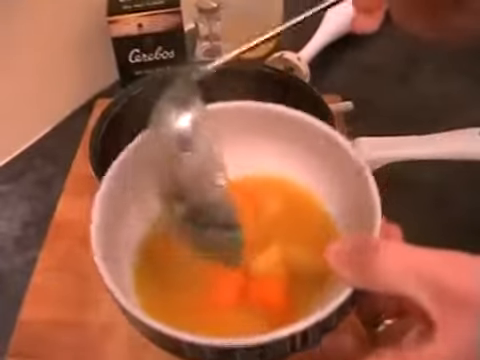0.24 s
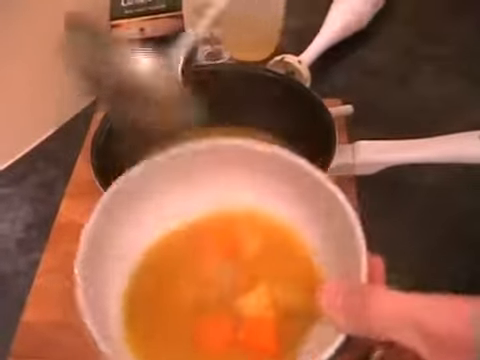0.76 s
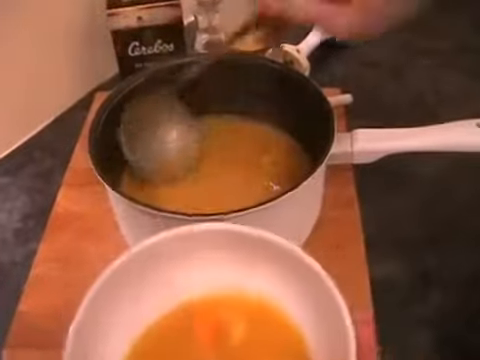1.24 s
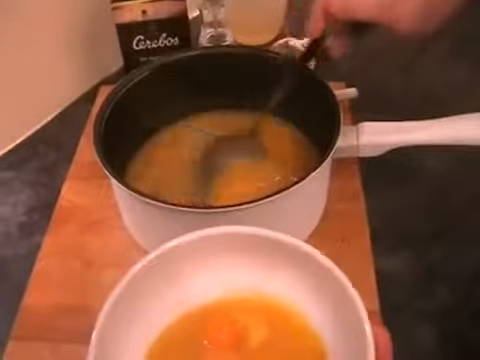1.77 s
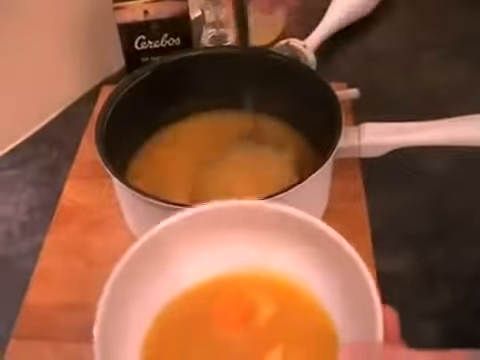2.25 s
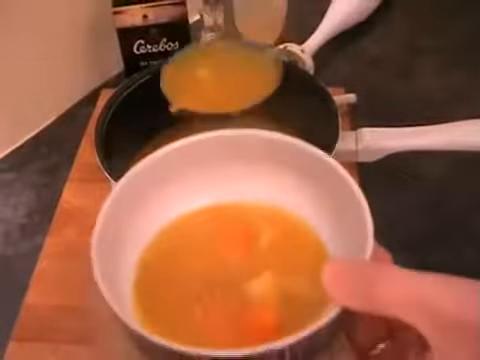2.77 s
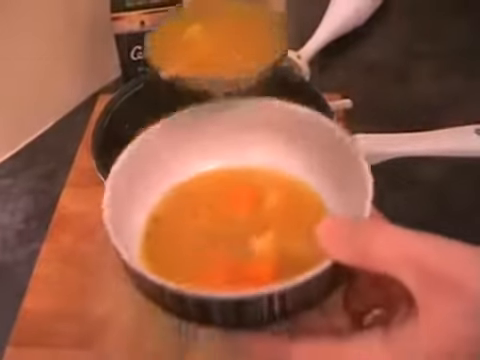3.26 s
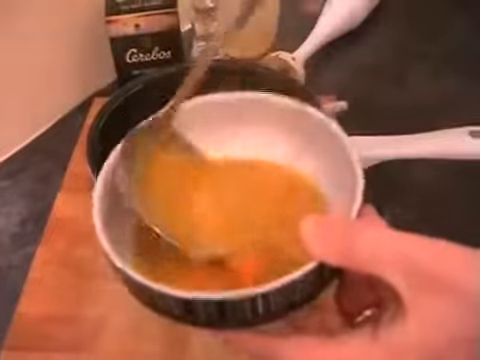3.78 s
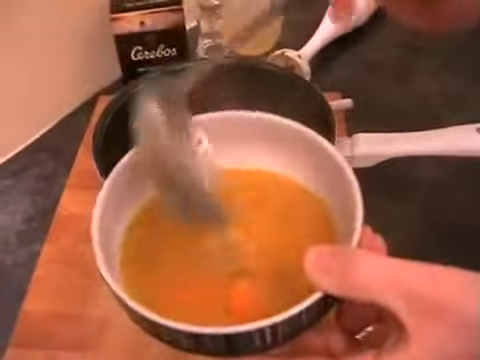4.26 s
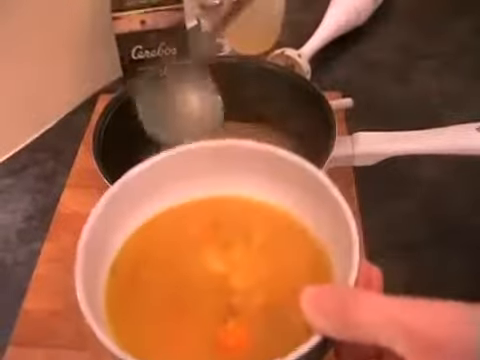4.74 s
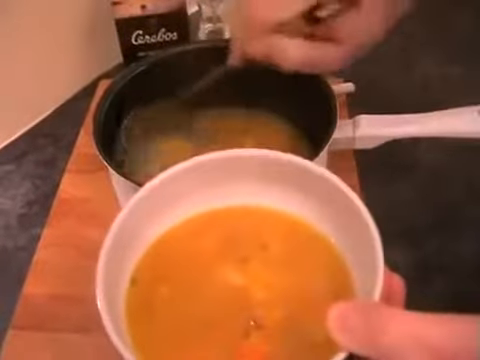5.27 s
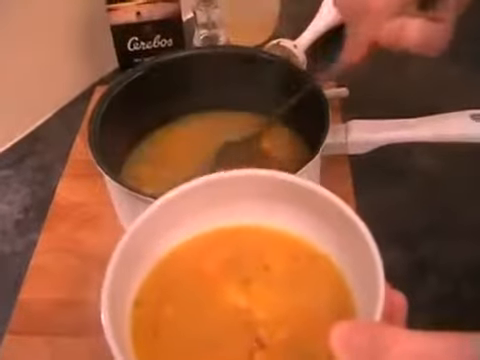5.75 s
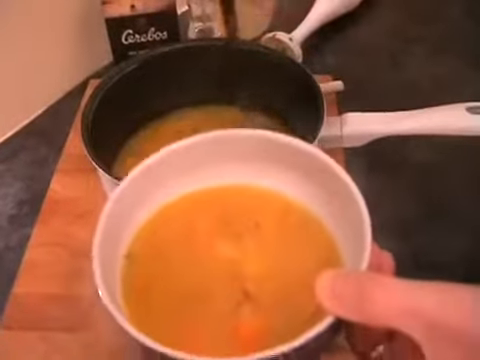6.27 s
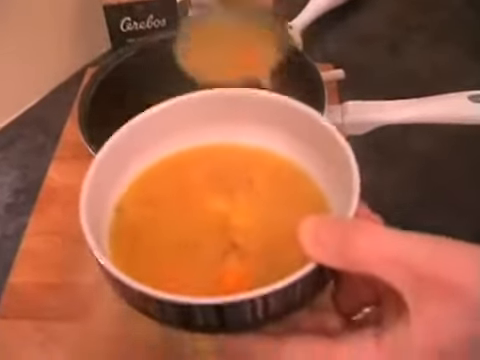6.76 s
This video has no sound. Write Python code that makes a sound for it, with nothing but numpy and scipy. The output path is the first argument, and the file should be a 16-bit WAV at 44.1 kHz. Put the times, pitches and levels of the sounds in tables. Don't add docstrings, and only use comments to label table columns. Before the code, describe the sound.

A steel ladle clanks hard into a soup pan, scrapes and stirs, then knocks several more times in a small hard kitchen with faint hum.

```python
import sys
import numpy as np
from scipy import signal
from scipy.fft import rfft, irfft
from scipy.io import wavfile
from scipy.ndimage import uniform_filter1d, minimum_filter1d

SR = 44100
rng = np.random.default_rng(int(sys.argv[2]) if len(sys.argv) > 2 else 0)


def wav_record(signal):
    frames = np.transpose(np.atleast_2d(signal))
    bounded = np.clip(frames, -1, 1)
    quanta = np.round(bounded * 32767).astype(np.int16)
    wavfile.write(sys.argv[1], SR, quanta)


def to_linear_factor(level_db):
    exponent = np.asarray(level_db, float) / 20
    return 10 ** exponent


N = 309582

# f/Hz, density/dB per Hz
AIR_SPECTRUM = [(15, -83.5), (25, -36), (69, -7.5), (89, -4), (202, -4.5), (229, -11.5), (279, -4.5),
                (358, -7), (459, -8.5), (494, -1.5), (589, -16.5), (650, -11), (1100, -20), (8220, -28),
                (9540, -39.5), (12400, -57.5), (21000, -120)]
AIR_DB, AIR_SWAY_DB = -44.5, 0.5
# f/Hz, width/Hz, level/dB
KITCHEN_PEAKS = [(364.5, 47, 3), (693, 103, -2.5), (989, 41, -8), (1335, 42, -12), (1911, 64, -12.5),
                 (2565, 34, -17)]
# f/Hz, level/dB rms
HUM = [(100, -51.5), (290, -56)]
# f/Hz, t60/s
ROOM_T60 = [(100, 1), (400, 0.4), (1500, 0.62), (4000, 0.54), (9000, 0.58)]

# t/s, length/s, start f/Hz, end f/Hz, level/dB rms
TRICKLES = [
    (0, 0.29, 8700, 9220, -66),
    (0.245, 0.36, 9100, 7940, -66.5),
    (2.913, .3, 7440, 8550, -71),
    (3.22, 0.18, 8550, 8850, -69),
]
# t/s, peak level/dB
CAMERA_TICKS = [(0.1024, -48), (0.1414, -50), (0.2214, -47), (0.3014, -44), (0.4614, -44), (0.5824, -52),
                (0.7003, -42), (0.7796, -47), (0.8205, -46), (0.9398, -48), (1.0999, -46), (2.2204, -49),
                (2.2604, -52), (2.4209, -51), (2.6599, -53), (2.7013, -46), (2.7402, -51), (2.82, -47),
                (2.9014, -46), (3.0215, -49), (3.1004, -50), (3.2999, -45), (3.3814, -52), (3.5009, -45),
                (3.5414, -47), (3.8214, -56), (3.8995, -46), (3.9804, -50), (4.2203, -46), (4.2617, -50),
                (4.4214, -53), (4.5414, -52), (4.6209, -49), (4.7014, -51), (4.7414, -51), (4.8199, -51),
                (6.4198, -50), (6.4592, -49), (6.5014, -51), (6.54, -49), (6.8593, -47)]

# t/s, peak level/dB, centre f/Hz, t60/s, width/share of centre
TICKS = [(0.99, -27.5, 8100, 0.019, 0.93), (1.196, -39, 8300, 0.021, 0.54), (1.622, -36, 7640, .015, 0.3),
         (1.7948, -37, 7000, 0.022, 0.27), (1.8346, -33.5, 4130, 0.18, 0.25),
         (1.884, -32.5, 7000, .015, .8), (1.9571, -21, 4000, 0.029, 1.5), (2.5057, -28, 7000, 0.079, 1.05),
         (3.1889, -17.5, 6350, 0.032, 0.43), (3.6263, -29.5, 6500, 0.035, 1.5),
         (3.648, -28, 6000, 0.092, 2.4), (3.664, -34, 5000, .015, 1.1), (3.691, -26.5, 1150, 0.053, 1.9),
         (3.6918, -27.5, 3900, .02, 0.45), (3.7157, -13, 5600, 0.0036, 1.4), (3.719, -32, 5900, .015, 0.75),
         (4.156, -24, 3930, 0.046, 0.41), (4.502, -41, 7500, .01, .64), (4.79, -32, 8800, 0.0081, 0.25),
         (4.9155, -21, 4500, .04, 1.2), (4.928, -13, 2500, 0.011, 1), (5.757, -32, 3000, 0.02, 3),
         (5.7786, -37, 3020, 0.014, 1.9), (5.918, -15.5, 5530, 0.012, 0.25),
         (6.5793, -28.5, 8000, 0.064, 0.46), (2.5065, -41, 3500, .02, 1.5), (3.189, -29, 2900, 0.028, 2),
         (3.192, -31, 6500, 0.22, 0.82), (3.6268, -42, 1950, 0.013, 0.33), (6.1086, -40, 2480, .03, 0.53),
         (6.119, -39, 7000, .05, 0.76), (6.1767, -32, 6000, .05, 1.3), (6.5793, -39, 3500, .02, 1.5),
         (1.2672, -12, 3000, .015, 1.7)]
# t/s, peak level/dB, centre f/Hz, t60/s,
# width/share of centre
REBOUNDS = [(1.2655, -8, 2200, .01, 1.2), (1.2690, -5, 2500, .012, 1.2), (1.3295, -19, 700, .02, 1.9),
            (1.35, -16, 900, 0.018, 1.5), (1.9415, -27, 3360, 0.022, .3), (1.9425, -15, 1390, 0.033, 0.79),
            (1.9575, -22.5, 1900, 0.045, .3), (1.958, -22, 3400, .03, .5), (4.9185, -16, 3300, .03, 0.22),
            (4.9245, -9, 700, .015, 1.2), (4.9265, -19, 4800, .025, .6), (4.9315, -20, 2500, .02, 0.45),
            (5.905, -23, 5000, .03, 0.75), (5.9185, -33.5, 6500, 0.023, .9),
            (5.9225, -9.5, 837, 0.05, 0.37), (5.9205, -21, 1850, .04, .2), (6.1188, -34, 5700, .06, .3),
            (6.1772, -37, 4800, .08, .4), (6.205, -38, 5000, .05, .5), (6.25, -38, 4600, .06, .3),
            (7.0088, -10.5, 700, 0.01, 0.84), (7.0125, -33, 6330, .03, .3)]
TICK_SEND_DB = -18

KNOCK_S = [1.2615, 1.941, 4.918, 5.3362, 5.9046, 7.0093]
# rattle peak level/dB, rattle t60/s, clack level/dB, ring level/dB, room send level/dB
KNOCKS = [
    (5, 0.032, -7, -21, -10),
    (-6.5, 0.13, -7, -10, -9.5),
    (-3, 0.07, -7, -16.5, -10.5),
    (-14.5, 0.14, -6, -16.5, -9),
    (-1.5, 0.1, -6.5, -13.5, -15),
    (-8.5, 0.081, -8, -31, 7),
]
# f/Hz, density/dB per Hz
RATTLES = [
    [(423, 7), (840, -2), (1060, -14), (1300, 5), (1560, -8.5), (1870, -3), (4200, -2), (9500, -16.5)],
    [(233, -3), (556, 0), (802, -6.5), (1390, -10), (2460, -22), (2760, -19.5), (3500, -22), (4460, -24.5),
     (9500, -42.5)],
    [(117, -6.5), (432, 0), (1400, -12.5), (3300, -14), (5870, -19), (8870, -31), (9500, -59)],
    [(404, -6.5), (1240, -20), (3310, -24), (4170, -26), (4570, -23), (5870, -27.5), (6440, -36),
     (9500, -41)],
    [(112, -12), (300, -3), (450, 2), (963, -22), (1870, -13.5), (3000, -20.5), (6440, -25), (9500, -45)],
    [(650, -4.5), (1450, -22), (1830, -31), (2120, -17.5), (2640, -26), (5000, -40), (6440, -42),
     (9500, -49)],
]
# f/Hz, density/dB per Hz
RATTLE_BASS = [(24, -45), (40, -17)]
RATTLE_TOP = [(12400, -69), (20900, -120)]
RATTLE_HOLD_S = 0.0033
# f/Hz, level/dB, t60/s
CLACKS = [
    [(427, -17, 0.063), (820, -2, 0.037), (1280, -20, 0.064), (1950, -1, 0.02), (2560, -6.5, 0.051),
     (4210, -10, 0.052)],
    [(525.7, 2.5, 0.12), (945, -12, 0.07), (1353, -7.5, 0.13), (2740, -6, 0.04), (3420, -8.5, 0.044),
     (4620, -16, 0.064)],
    [(423, 5.5, 0.071), (760, 1.5, 0.03), (1920, 1, 0.045), (2514, -5, 0.05), (3300, -14, 0.071),
     (5940, -20, 0.036)],
    [(413, 5.5, 0.1), (790, -4, 0.17), (1490, -7, .06), (3130, -17, 0.082), (3730, -9, 0.06),
     (4500, -3.5, 0.041)],
    [(397, 3.5, 0.077), (517, 9, 0.095), (903, -3, 0.12), (1363, -20, 0.08), (1877, 5.5, 0.05),
     (3670, -13, 0.035)],
    [(650, 1, 0.089), (1210, -29, 0.047), (1400, -4, 0.072), (2150, -26, .05)],
]

# f/Hz, level/dB, t60/s
ON_RIM = [(107.3, -5.5, 0.68), (218, -9, 0.68), (328, -11, 0.65), (836, -8.5, 0.2), (1218, -5, 0.54),
          (1313, -9.5, 0.47), (1780, -14, 0.59), (1870, -13, 0.27), (2310, -24, 0.41), (3070, -8.5, 0.52),
          (3636, -3, 0.3), (4580, -22, .4), (4630, -22, 0.23), (7360, -18, 0.18)]
ON_FAR_WALL = [(113.8, 1, 0.35), (190.5, -6.5, 0.57), (269, -13, 0.58), (404, -6, 0.24), (538, 14.5, 0.095),
               (568, -8, 0.52), (683, -10, 0.74), (976, -3, 0.2), (1030, -18, 0.39), (1360, -21, 0.34),
               (1850, -20.5, 0.36), (1916, -20, 0.24), (2780, -33, .08), (3350, -19, .07)]
ON_NEAR_WALL = [(105.7, 1.5, 0.33), (268, -5, 0.57), (329, -5, 0.37), (401, -6, 0.27), (519, 10, 0.098),
                (734, -7, 0.25), (948, -2.5, 0.24), (1660, -17, 0.42), (2390, -19, .4), (3110, -5.5, 0.19),
                (3320, -5, 0.15), (4500, -13, .09), (5600, -11, 0.11), (5930, -8, 0.056)]
ON_FLOOR = [(115.4, 6.5, 0.38), (222.4, 2.5, 0.42), (700, -15, .28), (980, -2, 0.31), (1590, -4, 0.25),
            (1950, -10.5, 0.6), (2360, -6.5, 0.18), (2750, -11, 0.45), (3080, -9.5, 0.15),
            (3695, -28, 0.33), (4450, -20, .25), (5222, -31, .43)]
ON_CORNER = [(111.5, 7, 0.3), (211, -4, 0.41), (265, -15, 0.97), (402, -2.5, 0.56), (504, -1, 0.44),
             (872, -3.5, 0.18), (988, -10, 0.32), (1390, -16, 0.41), (1783, -1, 0.17), (1820, 0, 0.12),
             (2240, -20, 0.18), (2766, -3, 0.085), (3680, -34, .3), (4700, -32, 0.36)]
ON_BOWL = [(523, 8, .14), (1037, 1, .2), (1894, -12, .22)]
RING_WOBBLE = 0.35

# t/s, f/Hz, level/dB, t60/s
NUDGES = [(1.328, 330, -16, .05), (1.347, 330, -19, .05), (1.376, 450, -16, .14), (1.398, 300, -21, .12),
          (4.9225, 430, -13, .06), (5.918, 520, -10, .05), (5.37, 330, -27, .15), (6.292, 690, -36, .5),
          (6.29, 1850, -46, .8), (6.272, 3070, -52, .5), (6.225, 3660, -46, .4), (6.228, 2480, -40, .15),
          (5.342, 3690, -35, .2), (5.342, 3060, -38, .3), (4.156, 4130, -37, .07), (1.263, 3130, -26, .4),
          (1.263, 3655, -25, .2), (4.93, 3060, -32, .2), (4.93, 4550, -37, .2), (5.16, 180, -36, .2)]

# f/Hz, width/Hz, level/dB
PAN_WALL = [(411, 29, 4), (475, 46, -1.5), (524, 16, 1.5), (704, 10, -3.5), (747, 27, -2.5),
            (817, 70, -1.5), (970, 53, -3), (1310, 4.3, -25)]
PAN_FLOOR = [(169.5, 9.2, -2), (214.5, 22, 4.5), (258.7, 24, 4), (331, 5.1, -3)]
STEEL = [(1235, 30, 3), (1820, 110, 3), (2460, 30, -0.5), (3110, 45, -2.5), (3600, 37, -7), (4580, 150, 2),
         (4930, 54, 0.5), (5750, 120, -1.5), (6510, 60, -12), (6930, 60, -14.5), (7800, 160, -13.5)]
BOARD_HZ, BOARD_WIDTH_HZ = 110.4, 15.3

# peak t/s, rise/s, fall/s, peak level/dB
SETTLES = [
    (1.33, 0.025, 0.089, -20),
    (5.08, 0.022, 0.2, -42),
    (6.0, 0.058, 0.025, -24.5),
]
SHOVES = [
    (1.422, 0.11, 0.082, -32),
    (1.676, 0.09, 0.2, -35),
    (1.79, 0.084, 0.17, -31.5),
    (5.186, 0.13, 0.064, -37),
    (5.574, .2, .3, -56),
    (5.702, 0.31, 0.33, -36.5),
    (6.315, 0.043, 0.039, -43),
]
SWEEPS = [
    (1.78, 0.18, 0.18, -36),
    (4.425, 0.029, 0.13, -51),
    (5.27, 0.11, 0.13, -44),
    (5.86, 0.14, 0.31, -44),
]
LIFTS = [
    (6.104, 0.064, 0.21, -27),
    (6.245, 0.73, 0.036, -34),
]
GRAZES = [
    (5.26, 0.1, 0.25, -49.5),
    (5.57, 0.19, 0.17, -60.5),
    (6.33, 0.045, 0.085, -67),
    (6.125, 0.052, 0.19, -52.5),
    (6.185, 0.1, 0.18, -44),
    (6.268, 0.32, 0.024, -42.5),
]
# board level/dB, pan floor level/dB, pan wall level/dB, bare steel level/dB
SETTLE_DB = (-21, -1, -11, -27)
SHOVE_DB = (1.5, -14, -12, -19)
SWEEP_DB = (-8, -24, 3.5, -28)
LIFT_DB = (-31, -1.5, -8, -20)
GRAZE_DB = (-34, -25, -2, 1)

# f/Hz, width/Hz, depth/0-1
TREBLE_DIPS = [(3300, 82, 0.4), (4100, 560, 0.21), (4920, 100, 1), (5360, 69, 0.6), (6600, 57, 1),
               (7150, 82, 0.8)]


def unit(x):
    return x / np.sqrt(np.mean(x ** 2) + 1e-30)


def on_log(hz, table):
    f, v = np.transpose(table)
    return np.interp(np.log(np.maximum(hz, 1)), np.log(f), v)


def colour(x, spectrum):
    size = 2048
    gain_db = on_log(np.arange(size // 2 + 1) * SR / size, spectrum)
    cepstrum = irfft(np.log(to_linear_factor(gain_db)))
    cepstrum[1:size // 2] *= 2
    cepstrum[size // 2 + 1:] = 0
    impulse = irfft(np.exp(rfft(cepstrum)))
    return signal.fftconvolve(x, impulse)[:len(x)]


def resonate(x, hz, width_hz):
    hz = min(hz, 0.45 * SR)
    return signal.lfilter(*signal.iirpeak(hz, hz / width_hz, fs=SR), x)


def body(x, peaks, spread):
    total = np.sqrt(np.pi / SR * sum(to_linear_factor(2 * db) for _, _, db in peaks))
    out = 0
    for k, (hz, width_hz, db) in enumerate(peaks):
        width_hz = width_hz * spread
        out = out + (-1) ** k * to_linear_factor(db) * resonate(x, hz, width_hz) / np.sqrt(width_hz)
    return out / total


def walk(rate_hz, count=N):
    hold = int(SR / rate_hz)
    steps = np.repeat(rng.standard_normal(count // hold + 1), hold)
    return unit(uniform_filter1d(steps, hold)[:count])


def fade(t, t60):
    return to_linear_factor(-60 * np.maximum(t, 0) / t60)


def add(track, s, x):
    i = int(s * SR)
    track[i:i + len(x)] += x[:N - i]


def ring(t, modes, rise_cycles, wobble, rate_hz):
    out = 0
    for hz, db, t60 in modes:
        swell = 1 - np.exp(-(t * hz / rise_cycles) ** 2)
        waver = np.exp(wobble * walk(rate_hz, count=len(t)))
        out = out + to_linear_factor(db) * swell * waver * fade(t, min(t60, 1.2)) * np.sin(2 * np.pi * hz * t)
    return out


def kitchen():
    t = np.arange(N) / SR
    broad = unit(colour(rng.standard_normal(N), AIR_SPECTRUM))
    boom = body(rng.standard_normal(N), KITCHEN_PEAKS, spread=0.5) * to_linear_factor(1.5 * walk(12))
    waver_db = 1.2 * walk(8)
    hum = sum(to_linear_factor(db + waver_db) * np.sqrt(2) * np.sin(2 * np.pi * hz * t) for hz, db in HUM)
    return to_linear_factor(AIR_DB) * (to_linear_factor(-1.5 + AIR_SWAY_DB * walk(4.6)) * broad + to_linear_factor(-4.5) * boom) + hum


def trickles():
    out, t = np.zeros(N), np.arange(N) / SR
    for s, length_s, from_hz, to_hz, db in TRICKLES:
        along = np.clip((t - s) / length_s, 0, 1)
        pitch_hz = (from_hz + (to_hz - from_hz) * along) * (1 + 0.012 * walk(150))
        gain = to_linear_factor(db + 1.5 * walk(43.5)) * np.sqrt(np.abs(np.sin(np.pi * along)))
        out += np.sqrt(2) * gain * np.sin(2 * np.pi * np.cumsum(pitch_hz) / SR)
    return out


def camera():
    out, t = np.zeros(N), np.arange(SR // 20) / SR
    for s, db in CAMERA_TICKS:
        click = resonate(rng.standard_normal(len(t)) * fade(t, 0.023), 6500, 3000)
        add(out, s, to_linear_factor(db + 1.0) * click / np.abs(click).max())
    return out


def ticks(table):
    near, send = np.zeros((2, N))
    t = np.arange(SR // 4) / SR
    snap = 1 + 0.83 * fade(t, 0.0035)
    for s, db, hz, t60, share in table:
        burst = rng.standard_normal(len(t)) * fade(t, t60) * snap
        burst[0] = 7
        tick = resonate(burst, hz, hz * share)
        tick = resonate(tick, hz, hz * share * 0.52)
        tick *= to_linear_factor(db) / np.abs(tick).max()
        add(near, s + 0.00039, tick)
        add(send, s, tick * to_linear_factor(TICK_SEND_DB))
    return near, send


def knocks():
    near, send = np.zeros((2, N))
    t = np.arange(SR) / SR
    low_pass = signal.butter(2, 1000, fs=SR, output="sos")
    rings = ON_RIM, ON_FAR_WALL, ON_NEAR_WALL, ON_FLOOR, ON_CORNER, ON_BOWL
    for s, row, spectrum, clacks, modes in zip(KNOCK_S, KNOCKS, RATTLES, CLACKS, rings):
        db, t60, clack_db, ring_db, send_db = row
        spectrum = RATTLE_BASS + spectrum + RATTLE_TOP
        contacts = rng.standard_normal(SR) * to_linear_factor(2.5 * walk(600, count=SR))
        rattle = colour(contacts * fade(t - RATTLE_HOLD_S, t60), spectrum)
        low = signal.sosfilt(low_pass, rattle)
        high = rattle - low
        rattle = low * (1 - np.exp(-(t / 0.0037) ** 2)) + high * (1 + 0.5 * fade(t, 0.014))
        rattle *= to_linear_factor(db) / np.abs(rattle).max()
        clack = ring(t, clacks, rise_cycles=3.2, wobble=0.2, rate_hz=160)
        blow = rattle + to_linear_factor(db + clack_db) * clack
        ringing = ring(t, modes, rise_cycles=3.2, wobble=RING_WOBBLE, rate_hz=48.3)
        add(near, s, blow + to_linear_factor(db + ring_db) * ringing)
        even = colour(fade(t, 0.00031), spectrum)
        even *= np.linalg.norm(blow) / np.linalg.norm(even)
        add(send, s, (0.28 * blow + even) * to_linear_factor(send_db))
    return near, send


def nudges():
    out, t = np.zeros(N), np.arange(SR // 2) / SR
    for s, *mode in NUDGES:
        add(out, s, ring(t, [mode], rise_cycles=4.7, wobble=0.1, rate_hz=51))
    return out


def drags():
    grit = rng.standard_normal((4, N))
    grit[2:] *= to_linear_factor(1.0 * walk(60) + 2.8 * walk(400))
    force, t = np.zeros((4, N)), np.arange(N) / SR
    kinds = ((SETTLES, SETTLE_DB), (SHOVES, SHOVE_DB), (SWEEPS, SWEEP_DB),
             (LIFTS, LIFT_DB), (GRAZES, GRAZE_DB))
    for strokes, parts_db in kinds:
        power = np.zeros(N)
        for s, rise_s, fall_s, db in strokes:
            away = np.maximum((s - t) / rise_s, (t - s) / fall_s)
            power += to_linear_factor(2 * (db - 20 * away))
        force += np.outer(to_linear_factor(np.array(parts_db)), np.sqrt(power))
    board, floor, wall, steel = grit * force
    board = body(board, [(BOARD_HZ, BOARD_WIDTH_HZ, 0)], spread=0.41)
    board = resonate(board, BOARD_HZ, 3 * BOARD_WIDTH_HZ)
    pan = body(floor, PAN_FLOOR, spread=0.85) + body(wall, PAN_WALL, spread=1.0)
    hiss = 1.04 * resonate(steel, 2100, 4500) + 0.24 * resonate(steel, 5200, 2200)
    return board + pan + 0.78 * body(steel, STEEL, spread=0.44) + hiss


def room(x):
    t = np.arange(SR) / SR
    tail = np.zeros(SR)
    for hz in 100 * 2 ** np.arange(0, 7, 0.5):
        tail += resonate(rng.standard_normal(SR), hz, hz / 3) * fade(t, on_log(hz, ROOM_T60))
    tail *= np.clip((t - 0.004) / 0.015, 0, 1)
    return signal.fftconvolve(x, tail / np.sqrt(np.sum(tail ** 2)))[:N]


def scene():
    background = kitchen() + trickles() + camera()
    tick, tick_send = ticks(TICKS)
    knock, knock_send = knocks()
    rebound, _ = ticks(REBOUNDS)
    nudge, drag = nudges(), drags()
    wet = room(to_linear_factor(2.0) * (knock_send + tick_send) + to_linear_factor(-18) * drag)
    return (background + tick + knock + rebound + nudge + drag + wet)[None]


def thin_treble(x, margin_db, from_hz, edge_hz):
    size, group = 1024, 3
    f, _, z = signal.stft(x, SR, "hann", nperseg=size)
    used = size // 2 // group * group
    hz = f[:used, None]
    power = uniform_filter1d(np.abs(z[:used]) ** 2, size=5, axis=1)
    bands = power.reshape(-1, group, z.shape[1]).mean(axis=1)
    ridge = -minimum_filter1d(-bands, size=3, axis=0)
    mask = np.minimum(np.roll(ridge, 2, axis=0), np.roll(ridge, -2, axis=0)) * to_linear_factor(-2 * margin_db)
    keep = np.repeat(bands ** 4 / (bands ** 4 + mask ** 4 + 1e-80), group, axis=0)
    present = uniform_filter1d(rng.standard_normal(bands.shape), size=9, axis=1) > -0.1
    keep *= np.where(hz > edge_hz, np.repeat(present, group, axis=0), 1)
    treble = np.sum(np.abs(z[f > from_hz]) ** 2, axis=0)
    attack = treble > 2.5 * np.roll(treble, 2)
    attack |= np.roll(attack, 1) | np.roll(attack, -1)
    z[:used] *= np.where((hz > from_hz) & ~attack, keep, 1)
    return signal.istft(z, SR, "hann", nperseg=size)[1][:len(x)]


def band_limit(x):
    return signal.sosfilt(signal.butter(12, 9690, fs=SR, output="sos"), x)


def record(dry):
    x = np.tanh(0.79 * dry) / 0.92
    x = signal.sosfilt(signal.butter(2, 45, "high", fs=SR, output="sos"), x)
    for hz, width_hz, depth in TREBLE_DIPS:
        x = x - min(depth, 1) * resonate(x, hz, width_hz)
    return band_limit(x)


dry = scene()
out = record(dry)
wav_record(out)
```